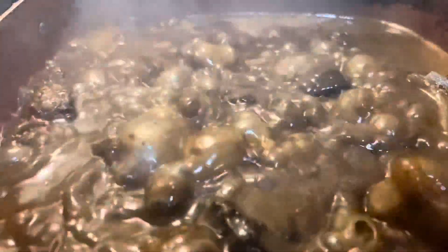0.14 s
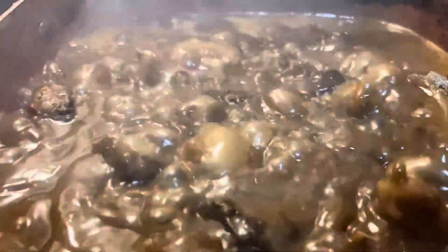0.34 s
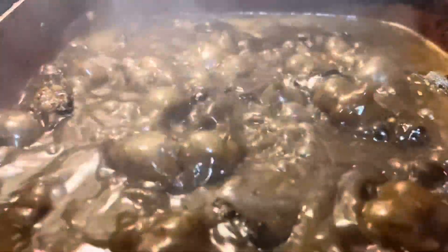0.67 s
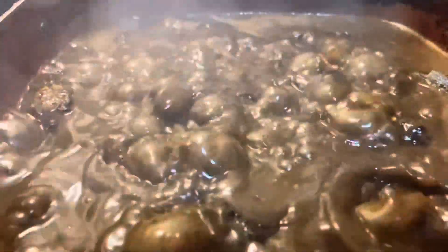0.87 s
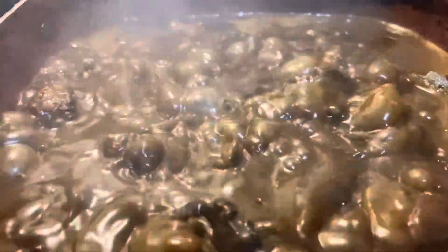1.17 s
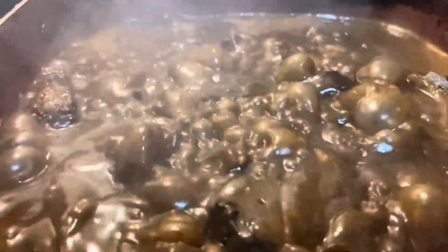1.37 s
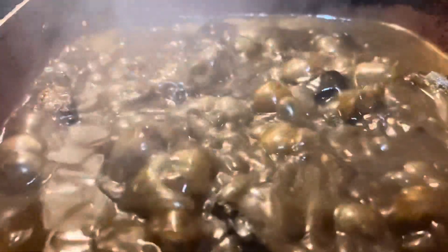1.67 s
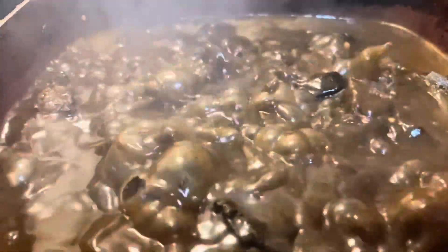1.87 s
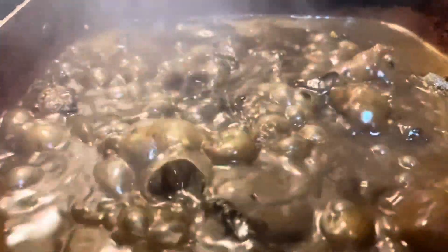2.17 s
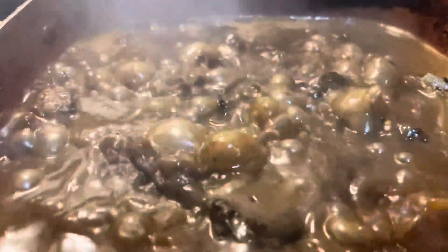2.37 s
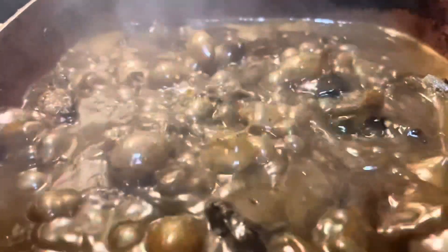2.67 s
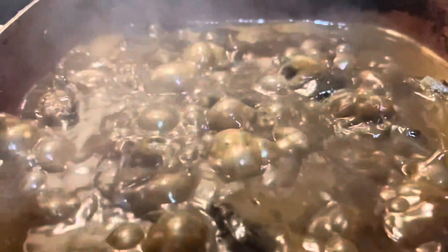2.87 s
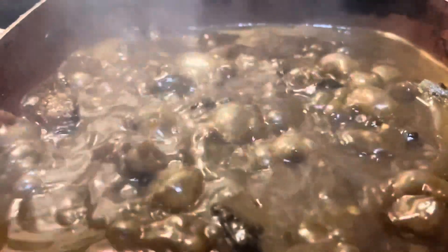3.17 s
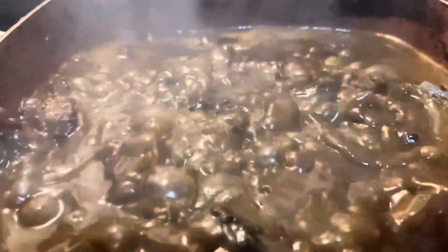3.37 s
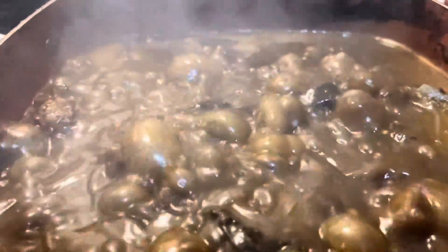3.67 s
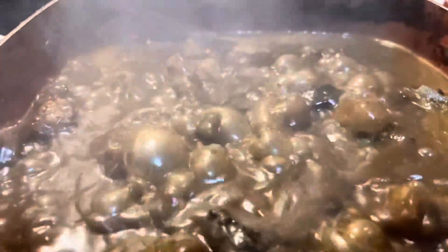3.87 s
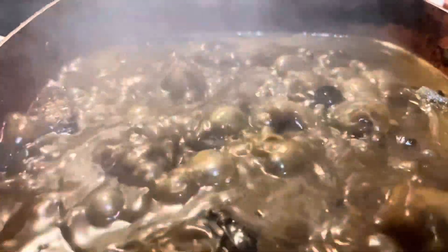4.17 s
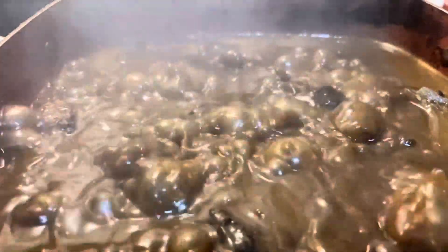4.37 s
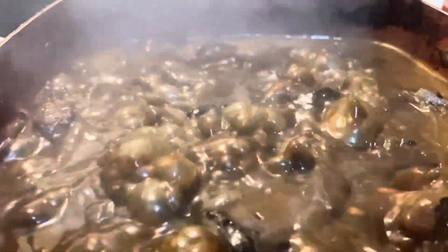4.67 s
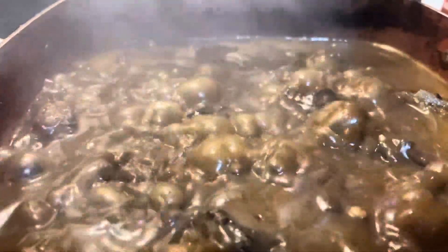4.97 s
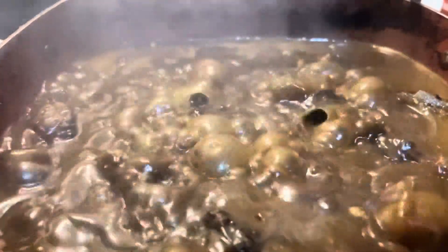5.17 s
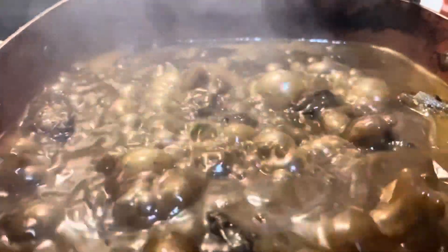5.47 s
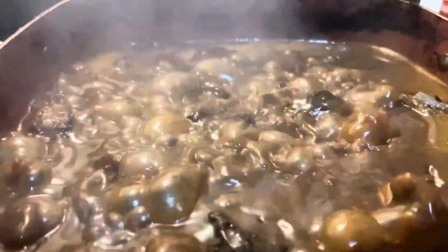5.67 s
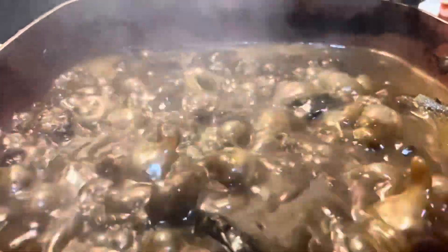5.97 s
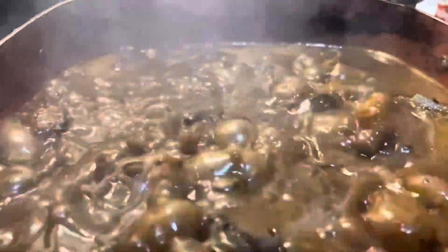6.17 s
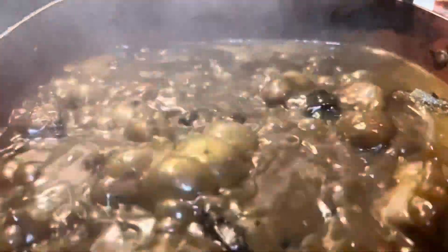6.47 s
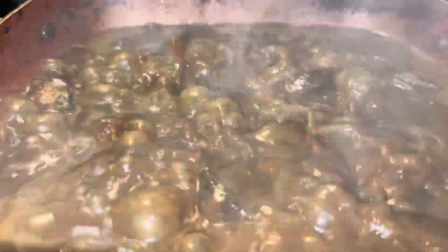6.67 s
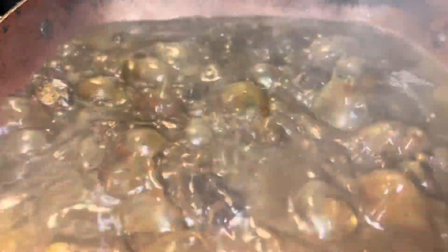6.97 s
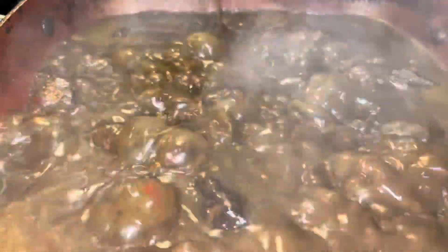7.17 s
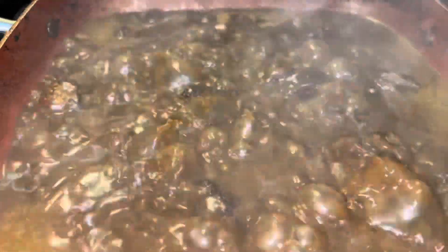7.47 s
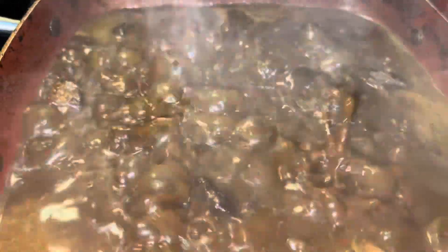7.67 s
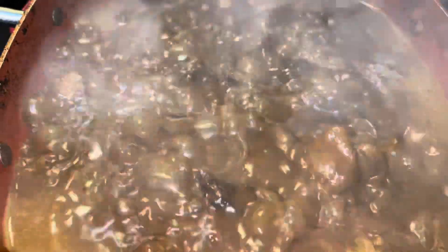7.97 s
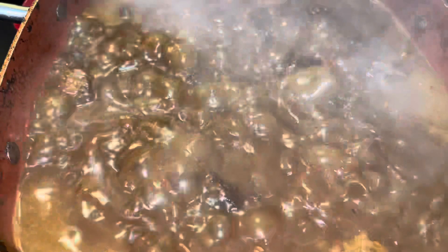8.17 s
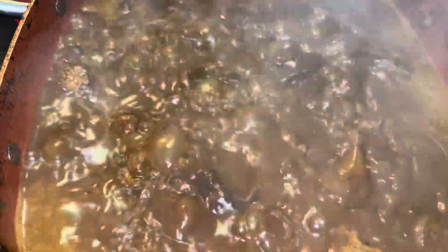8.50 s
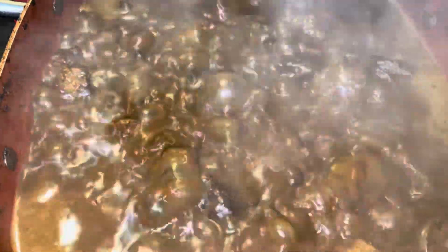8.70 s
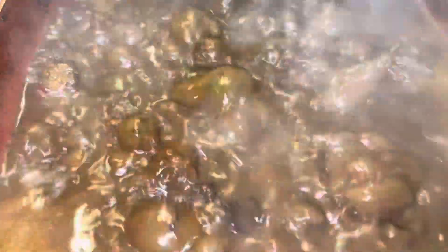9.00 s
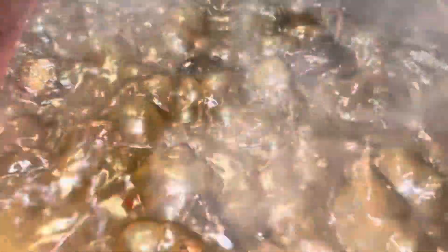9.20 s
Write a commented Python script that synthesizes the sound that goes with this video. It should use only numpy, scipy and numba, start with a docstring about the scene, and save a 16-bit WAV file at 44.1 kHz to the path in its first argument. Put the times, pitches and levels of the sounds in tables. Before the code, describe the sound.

A pot of thick stew boils close to a phone in a kitchen. For about six seconds it is slowed down: quiet, deep, muffled rumbling with sparse heavy plops. Then it quickly speeds up to a loud, wet gurgle with fine sizzle, popping bubbles and spits. A tiny dropout interrupts, the tone goes briefly hollow, and metal scrapes near the end.

```python
"""Deep, slow plops come first, then a hard boil at life speed: thick stew close to a phone with two microphone ports.
The opening plays eight times slower, deeper and quieter; then the speed climbs in steps. Gurgle and sizzle are
swarms of dying sines with flickering noise; near plops and spits ring one by one with bursts of noise. The sound
drops out for an instant, a narrow band goes missing for a second, and late on metal is dragged over metal:
stick-slip pulses ring its modes under a rasp of filtered noise."""
import sys
import numpy as np
from scipy import signal
from scipy.fft import rfft, irfft, next_fast_len
from scipy.io import wavfile
from scipy.ndimage import uniform_filter1d, map_coordinates
from numba import njit

SR = 44100
rng = np.random.default_rng(int(sys.argv[2]) if len(sys.argv) > 2 else 0)


def transcribe(signal):
    """Save signal, clipped to [-1, 1], as a 16-bit WAV file at the path in sys.argv[1]."""
    frames = np.atleast_2d(signal).T
    limited = np.clip(frames, -1, 1)
    pcm = np.round(limited * 32767).astype(np.int16)
    wavfile.write(sys.argv[1], SR, pcm)


N = 411835

SLOW = 1 / 8  # playing speed of the opening
# Playing speed, held in steps [from t/s, share of life speed]
PLAYING_SPEED = [(0, SLOW), (5.812, .28), (5.92, .42), (5.995, .58), (6.045, .72), (6.07, .85), (6.095, 1)]
LIFE_N = next_fast_len(int(4.3 * SR))  # samples of kitchen time
LEAD_S = 0.05  # the boil is already going when the sound begins

# Gurgle of the boil, quieter in slow motion, growing as the phone comes closer [t/s, level/dB before surges]
GURGLE_LEVEL = [(0, -48), (4.2, -49.5), (5.2, -47.5), (5.7, -52), (6.056, -53.5), (6.066, -44),
                (6.2, -35.5), (6.5, -36), (6.6, -39.5), (7.1, -39), (7.7, -37.5), (8.5, -37), (9.34, -33)]
# Colour of the gurgle at life speed [f/Hz, level/dB per Hz]
GURGLE_COLOUR = [(50, -39.5), (170, -10.5), (270, -2.5), (520, -6), (730, -8), (1000, -8), (1300, -13),
                 (2000, -31.5), (4000, -74.5)]
# Colour of the sizzle at life speed [f/Hz, level/dB per Hz]
SIZZLE_COLOUR = [(700, -28), (1500, 4.5), (2500, -3.5), (5000, -4.5), (7000, -11.5), (9000, -15),
                 (10200, -24.5), (12000, -47.5), (15500, -25.5), (19300, -32), (20300, -68.5)]
SIZZLE_DB, ROAR_DB = -25, -7  # relative to the gurgle
ROAR_SLOW_DB = -6.5  # thins the roar further until life speed is reached
GURGLE_SURGE_DB, SIZZLE_SURGE_DB = 1.1, 1.6  # how far the two swell together
CRACK_SHARE = 0.71  # cracks take this share of the sizzle's colour, in dB
RUMBLE_HZ, RUMBLE_WIDTH_HZ = 107.3, 29
# Deepest bass [t/s, level/dB]
SHUDDER_LEVEL = [(6.04, -68.5), (6.15, -48.5), (7.52, -75), (9.3, -46.5)]
# Two faint tones, as heard in slow motion [f/Hz, level/dB before wavering]
HUM = [(754, -77), (958, -79)]
HUM_FADES_S = (2.5, 3.5)  # begin and end of the fade

# Dragged metal [t/s, ringing level/dB, rasp level/dB, rasp centre f/Hz]
DRAG_STROKE = [(8.14, -66, -72, 5400), (8.19, -45, -56, 5330), (8.5, -45, -52.5, 5150),
               (8.74, -49.5, -53, 5000), (8.82, -61, -52.5, 6270), (9.2, -74, -52, 6440),
               (9.34, -73.5, -56, 6120)]
# Modes of the metal that ring [f/Hz, width f/Hz, level/dB before flicker]
METAL_MODES = [(4880, 60, -1), (5210, 40, 1), (5340, 40, 1), (5510, 45, 1), (5640, 40, 0)]
# Lower resonance that shifts along the stroke [t/s, f/Hz, level/dB before flicker]
SQUEAL_PATH = [(8.27, 2980, -51.5), (8.38, 3250, -64), (8.7, 3220, -61.5), (8.77, 3230, -55.5),
               (8.9, 3000, -65.5)]
# Stick-slip rate, slowing for most of the stroke [t/s, slips per second]
SLIP_RATE = [(8.15, 321), (8.24, 332), (8.28, 326), (8.4, 313.5), (8.56, 297), (8.72, 284), (8.8, 268),
             (8.9, 250)]
SLIP_WAVER, SLIP_GRIT, SLIP_LIMP = 0.002, 0.8, 0.22  # shares: uneven rate, noise, strong-weak alternation
RASP_WIDTH_HZ, RASP_PARTNER_RATIO, RASP_PARTNER_DB = 1200, 0.378, -9  # the partner is a lower, weaker rasp

# Big near bubbles that burst, as heard [t/s, level/dB before mixing, f/Hz]
PLOP_EVENTS = [(0.193, -35, 82), (1.298, -36, 103.3), (1.359, -37.5, 193), (2.26, -41.5, 123),
               (2.44, -42, 78), (3.455, -34.5, 130.8), (3.639, -30, 112), (4.37, -37.5, 71),
               (5.033, -39, 128.6), (5.372, -35.5, 68.6), (6.072, -33, 1290), (6.158, -23.5, 391),
               (6.286, -20, 990), (6.312, -24, 912), (6.415, -24.5, 410), (6.417, -26.5, 1050),
               (6.715, -23.5, 405), (6.844, -26.5, 880), (7.166, -22.5, 546), (7.428, -21, 504),
               (7.496, -27.5, 507), (7.723, -21, 1210), (7.834, -27.5, 960), (7.882, -21.5, 934),
               (7.978, -30.5, 935), (8.006, -20.5, 1020), (8.018, -24.5, 1090), (8.055, -29, 595),
               (8.078, -23, 603), (8.116, -27, 1230), (8.187, -19, 1096), (8.231, -21, 960),
               (8.239, -21, 498), (8.41, -27.5, 960), (8.571, -21, 568), (8.583, -20, 950),
               (8.622, -24.5, 493), (8.666, -27, 1320), (8.69, -25.5, 1624), (8.746, -23.5, 950),
               (8.753, -23, 912), (8.831, -23, 853), (8.853, -20.5, 948), (8.878, -24, 508),
               (8.89, -19.5, 1030), (8.925, -26, 1600), (8.961, -26, 1006), (9.247, -24, 506),
               (9.295, -22, 520)]
# Near droplets that spit, as heard [t/s, level/dB before mixing, f/Hz]
SPIT_EVENTS = [(0.232, -53.5, 497), (0.4, -49.5, 570), (1.098, -51.5, 730), (1.269, -52.5, 514),
               (1.84, -53, 720), (2.15, -52.5, 550), (3.88, -46.5, 440), (4.61, -52, 553),
               (6.2824, -32.5, 4940), (6.4131, -36, 5550), (6.5196, -34.5, 2540), (7.1215, -36, 3870),
               (7.333, -32.5, 5000), (7.5725, -39.5, 4160), (7.7186, -33.5, 2170), (7.7417, -30.5, 3630),
               (8.1374, -29, 4260), (8.4333, -28, 4460), (8.868, -42, 4100), (9.1195, -33, 5600),
               (9.2376, -18, 4350), (9.2599, -28.5, 2290)]

# The two ports at life speed [f/Hz, left minus right level/dB, likeness 0-1, right leads phase/rad]
PORT_PAIR = [(99, 4.5, 0.84, 0.34), (503, -4.5, 0.98, 0.32), (654, -6.5, 0.88, -1.47),
             (900, 5.5, .7, -1.36), (1480, -2, 0.8, -2), (2700, -1.5, 0, 0.1), (5400, -0.5, 0.1, -1.8),
             (9300, 0, 1, 0.64)]
PORT_LAG_S, PORT_LAG_FROM_HZ = 0.000279, 8770  # treble: right leads by a delay on top, zero phase at this f
DROPOUT_S, DROPOUT_DB = (6.5268, 6.5572), -37.5
HOLLOW_S = (6.55, 6.6, 7.43, 7.48, 7.58)  # begins, deepest, starts to slide, has slid, is gone
HOLLOW_HZ, HOLLOW_END_HZ, HOLLOW_Q, HOLLOW_DEPTH = 1169, 809, 5.25, 0.99
# Neighbours that change while the band is missing [f/Hz, width f/Hz, share added]
HOLLOW_TILT = [(1452, 280, -0.65), (1770, 260, 0.4), (2260, 280, 0.44)]
LOW_HZ, TOP_HZ = 23.2, 15900  # lowest and highest frequencies left in the sound as played


def undb(db):
    """Decibels to amplitude."""
    return 10 ** (np.asarray(db) / 20)


def unit(x):
    """Scales a sound to rms 1."""
    return x / np.sqrt(np.mean(np.square(x)))


def along(table, at):
    """Columns of a table read at the given places."""
    first, *rest = np.transpose(table)
    return [np.interp(at, first, c) for c in rest]


def over_hz(table):
    """Frequencies of the life-speed spectrum and the table's columns there, joined on a log axis."""
    hz = np.fft.rfftfreq(LIFE_N, 1 / SR) + 1  # keeps the log finite
    table = np.array(table, float)
    return hz, [np.interp(np.log(hz), np.log(table[:, 0]), c) for c in table[:, 1:].T]


def tint(x, table, share=1):
    """Weights the spectrum by a share of the table's dB, leaving the level as it falls."""
    _, (db,) = over_hz(table)
    return irfft(rfft(x) * undb(share * db), LIFE_N)


def colour(x, table, lo_hz, hi_hz, share=1):
    """Gives a flat sound its colour, with rms 1 in the named band."""
    hz, (db,) = over_hz(table)
    spec = rfft(x) * undb(share * db)
    in_band = (hz > lo_hz) & (hz < hi_hz)
    return irfft(spec, LIFE_N) / np.std(irfft(spec * in_band, LIFE_N))


def walk(rate):
    """Random levels held 1 / rate s and slewed twice; spread near 1."""
    k = int(SR / rate)
    held = np.repeat(rng.standard_normal(LIFE_N // k + 1), k)
    return 1.686 * uniform_filter1d(uniform_filter1d(held, k), k)[:LIFE_N]


@njit
def band(x, hz, width):
    """State-variable band-pass with moving centre and width, gain 1 at the centre."""
    y, b, l = np.empty(len(x)), 0., 0.
    for i in range(len(x)):
        g, k = np.tan(np.pi * hz[i] / SR), width[i] / hz[i]
        v = (b + g * (x[i] - l)) / (1 + g * (g + k))
        b, l, y[i] = 2 * v - b, l + 2 * g * v, k * v
    return y


@njit
def ring(n, start, hz, size, cycles, glide, turn, shift):
    """Rising, dying sines; the second row hears each by another path, shifted and turned in phase."""
    out = np.zeros((2, n))
    for e in range(len(start)):
        span = cycles[e] * SR / hz[e]  # samples to fall to 1 / e
        w = 2 * np.pi * hz[e] / SR
        z, other = size[e] + 0j, np.exp(1j * turn[e])
        p, rise = np.exp(1j * w - 1 / span), np.exp(1j * w * glide / span)
        for i in range(int(4 * span)):
            a, b = start[e] + i, start[e] + i + shift[e]
            if max(a, b) >= n or b < 0:
                break
            opening = min(i / (span / 4), 1.)
            out[0, a] += opening * z.imag
            out[1, b] += opening * (z * other).imag
            z *= p
            p *= rise
    return out


def grains(life_s, hz, size, cycles, glide, vary=1):
    """Bubbles at given moments; cycles scales how many it takes to fall to 1 / e."""
    turn, place, length = rng.random((len(hz), 3)).T
    shift = (20 * place - 10).astype(int)  # path difference in samples
    cycles = cycles * (0.59 + 1.72 * vary * length ** 2)
    return ring(LIFE_N, (life_s * SR).astype(int), hz, size, cycles, glide, 2 * np.pi * turn, shift)


def swarm(count, lo_hz, hi_hz, cycles, spread_db, glide, limit):
    """Countless small bubbles, some louder up to a limit; flat in colour."""
    when, pitch, luck = rng.random((count, 3)).T
    hz = lo_hz * (hi_hz / lo_hz) ** pitch
    louder_db = spread_db * np.minimum(-np.log(1 - luck), limit)
    return unit(grains(when * LIFE_N / SR, hz, hz * undb(louder_db), cycles, glide))


def churn(flicker_db, rate):
    """Flat noise on two paths whose level keeps flickering."""
    return rng.standard_normal((2, LIFE_N)) * undb(flicker_db * walk(rate))


def cracks(life_s, size, t60):
    """Sharp wide bursts of noise with a short spray after them; t60 in s."""
    blows = np.zeros(LIFE_N)
    np.add.at(blows, (life_s * SR).astype(int), size)
    fall = np.exp(-np.log(1000) / (t60 * SR * np.array([1, 6])))  # the spray lasts six times longer
    snap = signal.lfilter([1], [1, -fall[0]], blows)
    spray = signal.lfilter([1], [1, -fall[1]], blows)
    return (snap + 0.37 * spray) * rng.standard_normal((2, LIFE_N))


def at_life_speed(table, clock, speed):
    """Moment, pitch and size of listed bursts in kitchen time."""
    s, db, hz = np.transpose(table)
    i = np.minimum(s * SR, N - 1).astype(int)
    return clock[i], hz / speed[i], undb(db)


def slow_tones(heard_s):
    """Two faint wavering sines, pitched up here so that slow motion brings them down to place."""
    kitchen_s = np.arange(LIFE_N) / SR
    tones = sum(undb(db + walk(12)) * np.sin(2 * np.pi * hz / SLOW * kitchen_s) for hz, db in HUM)
    return tones * np.interp(heard_s, HUM_FADES_S, [1, 0])


def deep_shudder(heard_s):
    """Flickering noise in a narrow band at 40 Hz, its level following the table."""
    ones = np.ones(LIFE_N)
    level_db, = along(SHUDDER_LEVEL, heard_s)
    return undb(level_db) * unit(band(churn(0.68, 27)[0], 40 * ones, 25 * ones))


def burner_roar(heard_s, gurgle_db):
    """The burner rumbles below: flickering noise in a narrow low band, thinner in slow motion."""
    ones = np.ones(LIFE_N)
    roar = unit(band(churn(0.94, 9.2)[0], RUMBLE_HZ * ones, RUMBLE_WIDTH_HZ * ones))
    slowed = heard_s < PLAYING_SPEED[-1][0]
    return undb(gurgle_db + ROAR_DB + ROAR_SLOW_DB * slowed) * roar


def sizzle_surface():
    """Tiny ringing bubbles and flickering noise, with scattered cracks of spatter among them."""
    fizz = swarm(count=9000, lo_hz=1188, hi_hz=20320, cycles=4.34, spread_db=3.5, glide=0.03, limit=4.03)
    fizz = fizz + 0.64 * churn(2.7, 130)
    when, luck = rng.random((700, 2)).T
    size = undb(6.0 * np.minimum(-np.log(1 - luck), 3.5))
    spatter = unit(cracks(when * LIFE_N / SR, size, t60=0.011))
    coloured_spatter = colour(spatter, SIZZLE_COLOUR, 6700, 9500, share=CRACK_SHARE)
    return colour(fizz, SIZZLE_COLOUR, 6665, 9500) + 0.5 * coloured_spatter


def rolling_gurgle():
    """Many overlapping bubbles, each a dying sine of rising pitch, over flickering noise."""
    bubbles = swarm(count=2000, lo_hz=152.2, hi_hz=2489, cycles=4.04, spread_db=1.5, glide=0.052, limit=2)
    return colour(bubbles + 1.74 * churn(0.97, 30), GURGLE_COLOUR, 260, 970)


def boil(heard_s):
    """Gurgle and sizzle surge together as steam breaks through, over roar, tones and shudder."""
    gurgle_db, = along(GURGLE_LEVEL, heard_s)
    surge = walk(60)
    background = slow_tones(heard_s) + deep_shudder(heard_s) + burner_roar(heard_s, gurgle_db)
    sizzle = undb(gurgle_db + SIZZLE_DB + SIZZLE_SURGE_DB * surge) * sizzle_surface()
    gurgle = undb(gurgle_db + GURGLE_SURGE_DB * surge) * rolling_gurgle()
    return background + sizzle + gurgle


def metal_ringing(stroke, heard_s):
    """The stroke drives resonant modes of the metal, each of which comes and goes."""
    hz = np.fft.rfftfreq(LIFE_N, 1 / SR)
    spec = rfft(stroke)
    turns = np.exp(2j * np.pi * rng.random((len(METAL_MODES), 2, 1)))
    modes = 0
    for turn, (f, width, db) in zip(turns, METAL_MODES):
        mode = irfft(spec * turn / (1 + 2j * (hz - f) / width), LIFE_N)
        modes = modes + undb(db + 3.3 * walk(45)) * mode
    during = (heard_s > SLIP_RATE[0][0]) & (heard_s < SLIP_RATE[-1][0])
    return modes / np.std(modes[:, during])


def metal_squeal(stroke, heard_s):
    """A narrow resonance follows its path along the stroke and is gone as the stroke lifts."""
    hz, db = along(SQUEAL_PATH, heard_s)
    squeal = unit([band(row, hz, hz / 25) for row in stroke])
    squeal = squeal * np.interp(heard_s - SLIP_RATE[-1][0], [0, 0.08], [1, 0])
    return undb(db + 3.7 * walk(29.95)) * squeal


def metal_rasp(source, centre_hz):
    """Scraping noise in a wide moving band, with a lower and weaker partner."""
    rasp = 0
    for scale, db in (1, 0), (RASP_PARTNER_RATIO, RASP_PARTNER_DB):
        centre, width = scale * centre_hz, np.full(LIFE_N, scale * RASP_WIDTH_HZ)
        rasp = rasp + undb(db) * unit([band(band(row, centre, width), centre, width) for row in source])
    return rasp


def drag(heard_s):
    """Stick-slip pulses ring the modes of the metal; a wide rasp slides up as the stroke lifts."""
    ring_db, rasp_db, rasp_hz = along(DRAG_STROKE, heard_s)
    scrape = churn(2.4, 120)
    rate = along(SLIP_RATE, heard_s)[0] * (1 + SLIP_WAVER * walk(60))
    phase = 2 * np.pi * np.cumsum(rate) / SR
    pulses = sum(np.cos(k * phase) for k in range(7, 25))
    slips = unit(pulses * (1 + 2 * SLIP_LIMP * np.cos(phase / 2)))  # strong and weak in turn
    stroke = slips * undb(2.0 * walk(24.91)) + SLIP_GRIT * scrape
    ringing = undb(ring_db) * metal_ringing(stroke, heard_s)
    squeal = metal_squeal(stroke, heard_s)
    late_slips = slips * (heard_s > SLIP_RATE[-2][0])
    rasp = undb(rasp_db) * metal_rasp(scrape + late_slips, rasp_hz)
    return (heard_s > DRAG_STROKE[0][0]) * (ringing + squeal + rasp)


def near_spits(clock, speed):
    """Droplets ping briefly and crack in the colour of the sizzle."""
    when, hz, size = at_life_speed(SPIT_EVENTS, clock, speed)
    coloured = tint(cracks(when, size, t60=0.0033), SIZZLE_COLOUR, CRACK_SHARE)
    centre = np.interp(np.arange(LIFE_N) / SR, when, hz)
    crack = coloured - [band(row, centre / 3, centre * 0.7) for row in coloured]  # little below the ping
    pings = grains(when, hz, size, cycles=2.5, glide=0.02)
    return undb(4.0) * pings + undb(5.5) * crack


def near_plops(clock, speed):
    """Big bubbles ring as they burst, with a slosh of noise as the stew closes over."""
    when, hz, size = at_life_speed(PLOP_EVENTS, clock, speed)
    slosh = tint(cracks(when, size, t60=0.022), GURGLE_COLOUR)
    return grains(when, hz, size, cycles=6.5, glide=0.03, vary=0.3) + undb(4.0) * slosh


def bursts(clock, speed):
    """The nearest plops and spits: a shared path at both ports, a second one opposed between them."""
    straight, around = near_spits(clock, speed) + near_plops(clock, speed)
    return straight + 0.74 * around * np.array([[1], [-1]])


def ports(paths):
    """Left hears the first path; right hears it turned in phase, mixed with the second path."""
    hz, (db, like, lead) = over_hz(PORT_PAIR)
    like = np.clip(like, 0, 1)
    lead = lead + (hz > 4000) * 2 * np.pi * PORT_LAG_S * (hz - PORT_LAG_FROM_HZ)
    a, b = rfft(paths)
    left = a * undb(db / 2)
    right = (like * a * np.exp(1j * lead) + np.sqrt(1 - like ** 2) * b) * undb(-db / 2)
    return irfft([left, right], LIFE_N)


def hollow(x, s):
    """Takes a narrow band out, slides it down and fills it in, tilting its neighbours along with it."""
    span = slice(int(HOLLOW_S[0] * SR), int(HOLLOW_S[-1] * SR))
    hz = np.interp(s[span], HOLLOW_S[2:4], [HOLLOW_HZ, HOLLOW_END_HZ])
    depth = HOLLOW_DEPTH * np.interp(s[span], HOLLOW_S, [0, 1, 1, 1, 0])
    part = x[span]
    for tilt_hz, tilt_width, share in HOLLOW_TILT:
        part = part + share * depth * band(part, tilt_hz + 0 * hz, tilt_width + 0 * hz)
    for _ in range(2):
        part = part - depth * band(part, hz, hz / HOLLOW_Q)
    return np.concatenate([x[:span.start], part, x[span.stop:]])


def scene():
    """Makes the kitchen at life speed, then plays it along a clock that starts slow."""
    s = np.arange(N) / SR
    starts, speeds = np.transpose(PLAYING_SPEED)
    speed = speeds[np.searchsorted(starts, s, side="right") - 1]
    clock = LEAD_S + np.cumsum(speed) / SR  # kitchen time at each heard sample
    kitchen_s = np.arange(LIFE_N) / SR
    heard_s = np.interp(kitchen_s, clock, s)
    life = ports(boil(heard_s) + drag(heard_s)) + bursts(clock, speed)
    # silent at both ends, where the resampling wraps around
    life *= np.interp(kitchen_s, [0, LEAD_S, clock[-1], LIFE_N / SR], [0, 1, 1, 0])
    fine = signal.resample(life, 4 * LIFE_N, axis=1)
    played = [map_coordinates(row, [4 * SR * clock], order=1) for row in fine]
    played = np.array([hollow(row, s) for row in played])
    dropped = (s > DROPOUT_S[0]) & (s < DROPOUT_S[1])
    return played * np.where(dropped, undb(DROPOUT_DB), 1)


def record(dry):
    """The deepest bass and the top are cut; a trace of hiss stays."""
    low_cut = signal.sosfilt(signal.butter(4, LOW_HZ, "high", fs=SR, output="sos"), dry)
    hiss = undb(-100) * rng.standard_normal(dry.shape)
    top_cut = signal.ellip(10, 0.2, 70, TOP_HZ, fs=SR, output="sos")
    return signal.sosfilt(top_cut, low_cut + hiss)


dry = scene()
out = record(dry)
transcribe(out)
```